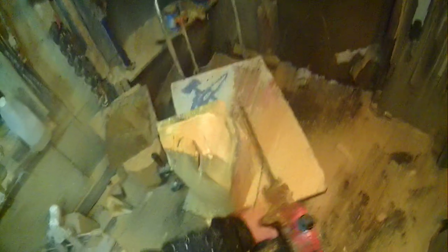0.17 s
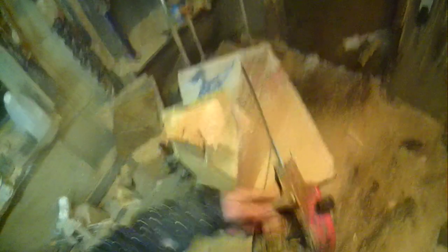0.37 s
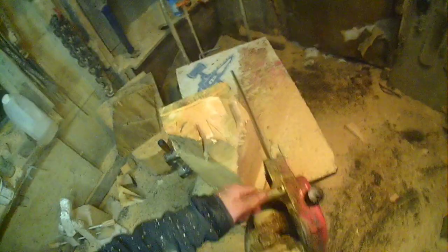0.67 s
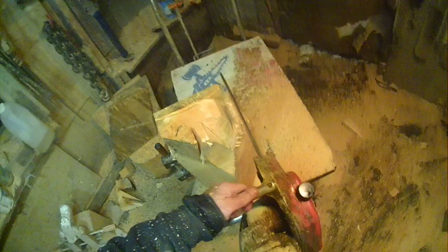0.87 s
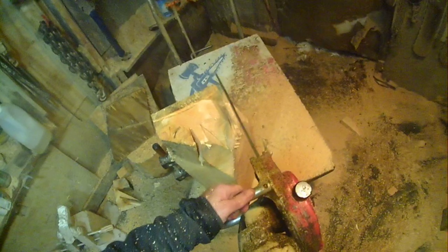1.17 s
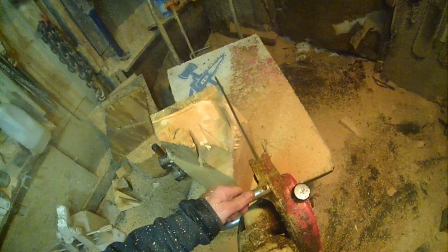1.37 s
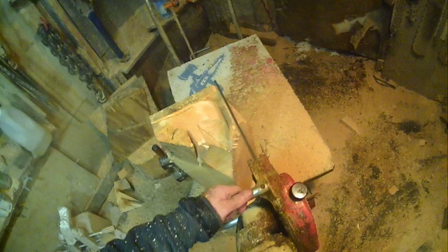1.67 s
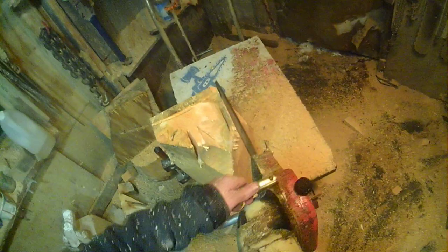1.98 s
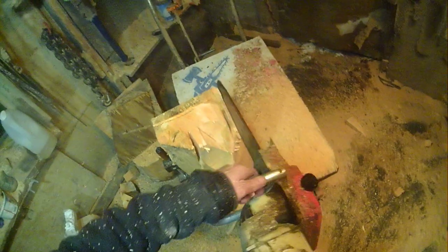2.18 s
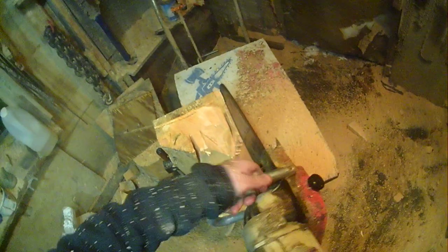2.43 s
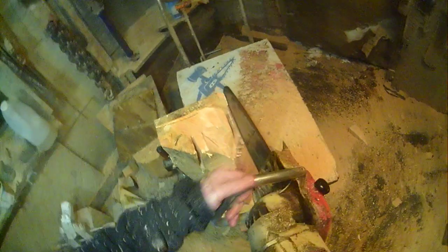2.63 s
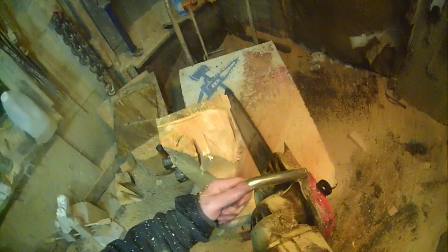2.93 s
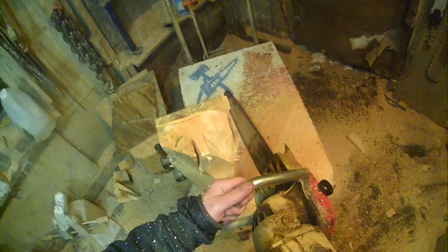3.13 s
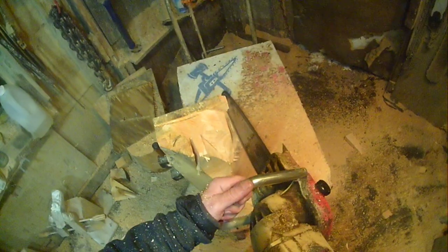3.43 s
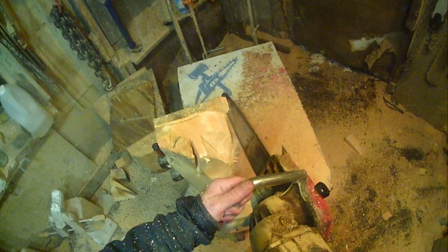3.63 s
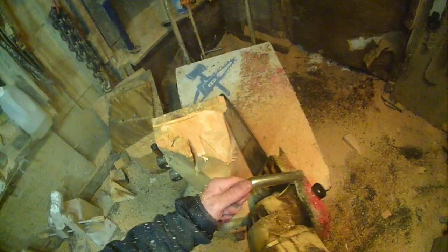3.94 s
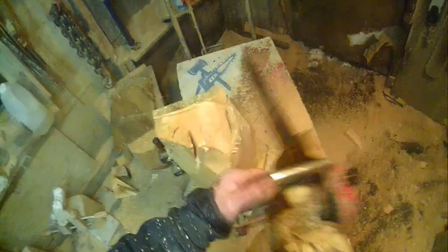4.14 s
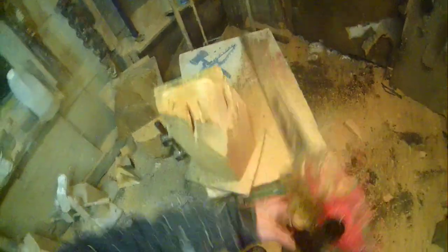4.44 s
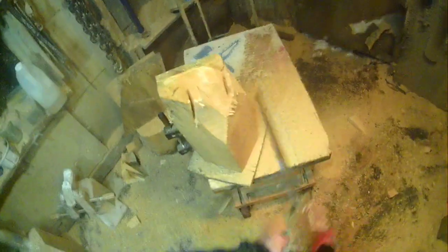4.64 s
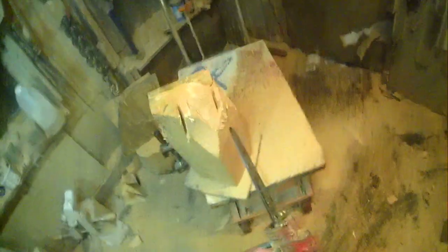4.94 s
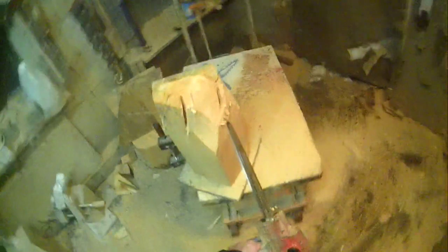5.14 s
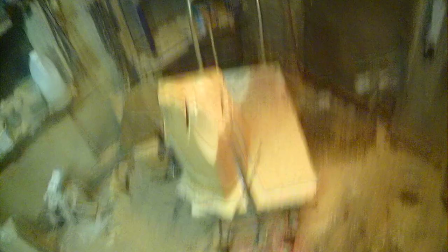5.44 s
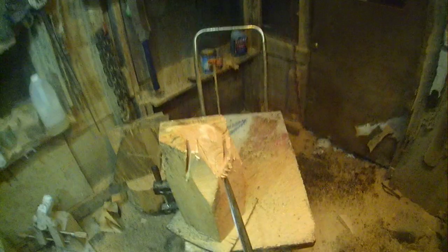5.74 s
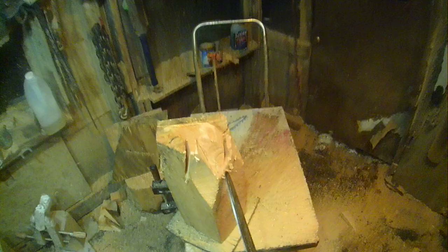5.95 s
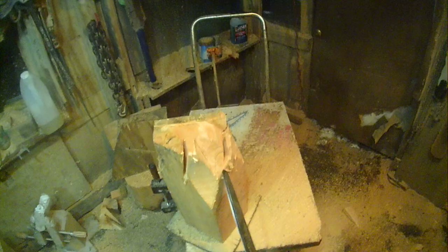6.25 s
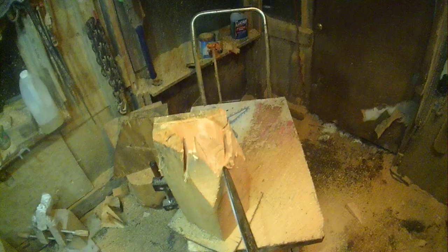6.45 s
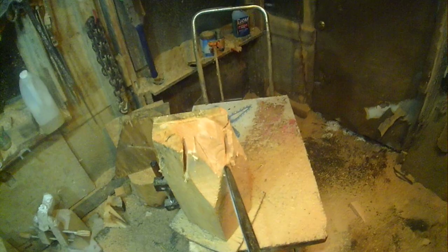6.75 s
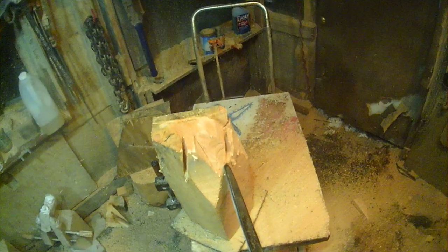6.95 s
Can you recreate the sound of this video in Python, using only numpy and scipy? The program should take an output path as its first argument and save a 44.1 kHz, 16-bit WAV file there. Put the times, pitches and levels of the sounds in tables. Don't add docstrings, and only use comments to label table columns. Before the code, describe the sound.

A motor saw is already at full speed, close up in a small, dry shed: clean hum around 380 Hz, a wavering whine twelve times higher, a buzzing drive-link note, and dense gritty chain rattle over a drumming wood block. A short opening buzz fades by 0.2 s. From 0.4 to 0.75 s the trigger is released and pitch dips, then recovers. Between 1.3 and 4.1 s the cut loads the motor, pitch sagging unevenly while wood drumming and chip spray thicken; a short scrape comes at 3.8 s. At 4.13 s the motor is let go and glides down steadily, with bright scrapes and a sharp tick around 4.4-4.5 s, the rattle thinning. At 5.8 s power returns and pitch climbs quickly, continuing to 7.1 s with a gear note and low scrape near 6.9 s. Thin, treble-poor microphone; tiny clicks every 0.2 s.

```python
import sys
import numpy as np
from scipy import signal
from scipy.fft import rfft, irfft, next_fast_len
from scipy.io import wavfile

SR = 44100
rng = np.random.default_rng(int(sys.argv[2]) if len(sys.argv) > 2 else 0)


def gain_from_db(level_db):
    decades = np.asarray(level_db, float) / 20
    return 10 ** decades


def file_out(sig):
    cols = np.atleast_2d(sig).T
    lim = np.clip(cols, -1, 1)
    pcm = np.round(lim * 32767).astype(np.int16)
    wavfile.write(sys.argv[1], SR, pcm)


N = 313551
LINKS_PER_TURN = 25 / 12
USUAL_TURNS_PER_S = 370


def rms_one(x):
    return x / np.sqrt(np.mean(x ** 2) + 1e-20)


def in_time(rows):
    s, *columns = np.transpose(rows)
    return [np.interp(np.arange(N) / SR, s, column) for column in columns]


def bump(at_s, half_width_s):
    return np.exp(-((np.arange(N) / SR - at_s) / half_width_s) ** 2)


def drift(rate_hz):
    r = np.exp(-80 * np.pi * rate_hz / SR)
    noise = rng.standard_normal(N // 40 + 2002)
    slow = signal.lfilter([1], [1, -2 * r, r * r], noise)[2000:]
    return np.interp(np.arange(N) / 40, np.arange(len(slow)), rms_one(slow))


# off_s, on_again_s
COASTS = [
    (.391, .742),
    (4.13, 5.796),
]
# time_s, speed_turns_per_s
ALLOWED = [(0, 386), (.2, 393), (.4, 388), (.8, 387), (1.25, 388.7), (1.45, 375.2), (1.75, 378),
           (2.0, 382.6), (2.6, 377.9), (2.9, 364.3), (3.2, 371.5), (3.6, 355), (4.0, 356.4), (4.1, 384.5),
           (5.8, 384.5), (6.2, 376.9), (6.7, 384.8), (7.1, 371.7)]


def rotor():
    step_s, spin_up_s = .001, .5
    drag_turns_per_s2, drag_power = 98.2, 1.53
    t = np.arange(0, N / SR + step_s, step_s)
    allowed = np.interp(t, *np.transpose(ALLOWED))
    coasting = sum((t >= off) & (t < on) for off, on in COASTS)
    speed = [376]
    for goal, free in zip(allowed, coasting):
        now = speed[-1]
        drag = drag_turns_per_s2 * (now / USUAL_TURNS_PER_S) ** drag_power
        change = -drag if free else (goal - now) / spin_up_s
        speed.append(now + step_s * change)
    return np.interp(np.arange(N) / SR, t, speed[:-1])


# speed_turns_per_s, level_db
HUM = [(245, -74), (258, -53), (270, -42.5), (295, -40), (312, -35), (335, -29), (360, -26.5), (380, -26.5)]
# speed_turns_per_s, level_db
WHINE = [(245, -34), (263, -37), (278, -44), (292, -44), (312, -41), (340, -32.5), (366, -33.5), (381, -38)]
# time_s, gain_db
AWAY = [(0, -1.5), (2.6, -2), (3.5, -4), (4.0, -4), (4.35, -2), (4.55, -3.5), (5.0, -3.5), (6.1, -7.5),
        (6.4, -5), (6.75, -8.5), (7.11, -5.5)]
# time_s, whine_gain_db
VENTS = [(0, 0), (.36, 4.5), (.75, -3.5), (1.2, 4), (1.9, 1), (2.15, 5), (2.45, -9.5), (2.7, 1), (2.95, 0),
         (3.35, 10), (3.7, 1), (3.9, 5.5), (4.27, 4.5), (4.47, -6), (4.9, -1), (5.17, -9), (5.4, 0),
         (7.11, -1.5)]
# time_s, level_db
TENSION = [(0, -41), (.27, -35.5), (.4, -43), (.5, -33.5), (.76, -45), (1.25, -35), (1.9, -35), (2.0, -42),
           (2.12, -37), (2.55, -36.5), (3.15, -30), (3.52, -31.5), (3.95, -39), (4.86, -45), (5.0, -61),
           (6.0, -52), (6.4, -38.5), (7.11, -35)]


def motor_levels(speed):
    away_db, = in_time(AWAY)
    vents_db, = in_time(VENTS)
    link_db, = in_time(TENSION)
    hum_db = np.interp(speed, *np.transpose(HUM)) + away_db
    slot_db = np.interp(speed, *np.transpose(WHINE)) + away_db + vents_db
    return hum_db, slot_db, link_db


def tone(turns, multiple, db, waver_db):
    wave = np.sin(2 * np.pi * (multiple * turns + rng.random()))
    return np.sqrt(2) * gain_from_db(db + waver_db * drift(11)) * wave


# multiple_of_rotor, level_under_bar_rattle_db
GEARS = [(25 / 4, -22), (25 / 3, -24)]
# start_s, end_s, multiple_of_rotor, level_db
SPELLS = [
    (1.36, 1.86, 25 / 48, -57),
    (0, .2, 4 / 3, -42),
    (0, .17, 2, -38),
    (2.4, 2.8, 25 / 8, -43),
    (4.33, 4.5, 25 / 8, -40),
    (6.25, 6.7, 25 / 8, -52),
    (6.68, 7.2, 25 / 8, -37),
    (5.4, 5.7, 25 / 12, -55),
    (5.74, 5.92, 25 / 12, -47),
]
# time_s, change_db
FADES = [(.22, -10), (.26, -8), (.305, -17), (.36, 4), (.62, -7), (.78, -7), (.84, 3), (1.3, -5),
         (1.35, -6), (2.43, -12), (3.73, -7), (4.42, -10), (4.52, -14), (4.6, 5), (4.655, -20), (4.75, -8),
         (4.88, -8), (5.07, -10), (5.56, -10), (5.64, -7), (5.72, -9), (5.83, -3), (5.96, -8), (6.04, -8),
         (6.16, -22), (6.275, -16), (6.39, -16), (6.55, -14), (6.87, -12), (7.03, -6)]


def motor(turns, hum_db, slot_db, link_db, bar_db):
    t = np.arange(N) / SR
    slot_db = slot_db + sum(db * bump(s, .022) for s, db in FADES)
    out = tone(turns, 1, hum_db, waver_db=0.2)
    out += tone(turns, 12, slot_db, waver_db=2.0)
    out += tone(turns, LINKS_PER_TURN, link_db, waver_db=0.44)
    for multiple, db in GEARS:
        out += tone(turns, multiple, bar_db + db, waver_db=4.5)
    for on, off, multiple, db in SPELLS:
        gate = np.clip(np.minimum(t - on + .03, off - t) / .04, 0, 1)
        out += gate * tone(turns, multiple, db, waver_db=.8)
    return out


# time_s, chain_rattle_at_usual_speed_db, bite_into_block_db
CUT = [(0, -28.5, 0.5), (.15, -30.5, -0.5), (.45, -27.5, 0.5), (.72, -27.5, 0), (1.2, -28, 0.5),
       (1.68, -26, 0.5), (2.0, -27, 1), (2.5, -26.5, 2), (2.9, -25.5, 1.5), (3.3, -25.5, 1), (3.75, -25, 3),
       (3.98, -25.5, 2.5), (4.2, -27.5, 2), (4.45, -25.5, -1.5), (4.7, -29.5, 0.7), (5.1, -31, 1),
       (6.3, -31.5, -0.6), (7.11, -28.5, 0)]
# time_s, half_width_s, extra_ring_db, extra_chip_spray_db
DIGS = [(.15, 0.28, 3, 1.5), (.75, 0.3, -0.5, -1.5), (1.5, .1, -1, 1.5), (1.75, 0.17, 0.5, 0.5),
        (2.35, 0.2, -2.5, -1.5), (2.9, .15, 0.5, 0.5), (3.4, 0.066, 3, -0.5), (3.65, .17, 3, 1),
        (4.17, 0.08, -1, -5), (4.4, 0.11, 3, 1), (5.4, 0.17, 2.5, -1.5), (6.5, .15, 1.5, -2)]


def chain_levels(speed):
    rattle_db, bite_db = in_time(CUT)
    bar_db = rattle_db + 30.5 * np.log10(speed / USUAL_TURNS_PER_S)
    dig_db, spray_db = sum(np.outer(db, bump(s, half)) for s, half, *db in DIGS)
    block_db = bar_db - 13 + 1.12 * bite_db
    nose_db = bar_db - 3.5 + 0.22 * bite_db + dig_db
    chips_db = bar_db - 15.5 + 0.87 * bite_db + spray_db
    return block_db, bar_db, nose_db, chips_db


def contacts(turns, grit_db, beat):
    grit = np.minimum(rng.exponential(1, N), 5)
    sizes = gain_from_db(grit_db * grit) * rng.standard_normal(N)
    return sizes * (1 + beat * np.cos(2 * np.pi * LINKS_PER_TURN * turns))


def body(force, modes, patchy_db, rate_hz):
    out = 0
    for k, (hz, width_hz, db) in enumerate(modes):
        r = np.exp(-np.pi * width_hz / SR)
        feedback = [1, -2 * r * np.cos(2 * np.pi * hz / SR), r * r]
        push = force * gain_from_db(db + patchy_db * drift(rate_hz))
        ring = signal.lfilter([(1 - r * r) / 2, 0, (r * r - 1) / 2], feedback, push)
        out = out + (-1) ** k * ring
    return out


def microphone(x):
    low = signal.butter(3, 284, "high", fs=SR, output="sos")
    high = signal.butter(4, 5300, fs=SR, output="sos")
    return signal.sosfilt(np.vstack([low, high]), x)


# pitch_hz, width_hz, level_db
BLOCK = [(315, 170, -11), (516.5, 80, 1), (624, 88, 1.5), (728, 100, -2)]
BAR = [(880, 300, -15), (1139, 82, -5), (1317, 120, -2.5), (1586, 135, -0.5), (1737, 59, 2),
       (1872, 143, -2), (2200, 430, -6.5)]
NOSE = [(2379, 80, -3.5), (2612, 102, 1), (2820, 76, 2), (2996, 255, -3.5), (3200, 480, -9.5)]
CHIPS = [(3430, 1100, -11.5), (4066, 190, -0.5), (4566, 490, -2), (5075, 830, -5)]
FAN = [(3600, 580, -5.5), (4300, 420, -1.5), (5090, 530, -1.5), (5207, 130, -4), (5970, 570, -15.5)]
CASE = [(131, 110, -8), (210, 70, -7.5), (354, 70, -6), (468, 67, -6), (721, 130, -1.5), (817, 210, 0.5),
        (1063, 88, 0.5)]


def chain(turns, speed, block_db, bar_db, nose_db, chips_db):
    speed_decades = np.log10(speed / USUAL_TURNS_PER_S)
    parts = [(BLOCK, block_db + 0.89), (BAR, bar_db + 0.13), (NOSE, nose_db + 0.065), (CHIPS, chips_db + 4.5),
             (FAN, -43 + 45 * speed_decades), (CASE, -41.5 + 25 * speed_decades)]
    out = 0
    for modes, db in parts:
        force = contacts(turns, grit_db=3.5, beat=.25)
        ring = body(force, modes, patchy_db=.9, rate_hz=40)
        out = out + gain_from_db(db) * rms_one(microphone(ring))
    return out


# pitch_hz, level_db
RUMBLE = [(25, -24), (60, -21.5), (100, -16.5), (160, -7.5), (235, -8), (300, 5), (400, -10.5),
          (600, -34.5)]


def rumble(block_db):
    hz = np.maximum(np.arange(N // 2 + 1) * SR / N, 1)
    known_hz, known_db = np.transpose(RUMBLE)
    colour_db = np.interp(np.log(hz), np.log(known_hz), known_db) - 60 * (hz > 1500)
    noise = irfft(rfft(rng.standard_normal(N)) * gain_from_db(colour_db), N)
    return gain_from_db(-17 + block_db + 0.71 * drift(2.8)) * rms_one(noise)


def hiss():
    return gain_from_db(-76) * rms_one(signal.lfilter([1], [1, -.99], rng.standard_normal(N)))


def rasp(hz, width_hz):
    mode = [(hz, width_hz, 0)]
    once = body(rng.standard_normal(N), mode, patchy_db=1.2, rate_hz=30)
    return rms_one(body(once, mode, patchy_db=0, rate_hz=30))


# time_s, half_width_s, pitch_hz, width_hz, level_db
SCRAPES = [
    (4.41, .04, 4550, 500, -38),
    (4.465, .011, 4500, 600, -32),
    (4.63, .008, 3350, 400, -42),
    (3.83, .02, 2950, 400, -33),
    (6.93, .12, 1600, 450, -36),
]


def scrapes():
    return sum(gain_from_db(db) * bump(s, half) * rasp(hz, width) for s, half, hz, width, db in SCRAPES)


def shed(x):
    t60_s, echo_db = .18, -15
    size = next_fast_len(N + SR)
    w = 2 * np.pi * np.arange(size // 2 + 1) / size
    echo = 0
    for lag in rng.uniform(.012, .04, 8) * SR:
        loss = gain_from_db(-60 * lag / SR / t60_s)
        echo = echo + 1 / (1 - loss * np.exp(-1j * w * lag)) - 1
    return irfft(rfft(x, size) * (1 + gain_from_db(echo_db) * echo / np.sqrt(8)), size)[:N]


def scene():
    speed = rotor()
    turns = np.cumsum(speed) / SR
    levels = chain_levels(speed)
    block_db, bar_db = levels[:2]
    noise = shed(chain(turns, speed, *levels) + scrapes())
    notes = motor(turns, *motor_levels(speed), bar_db)
    return (notes + noise + rumble(block_db) + hiss())[None]


def converter(x):
    half_rate_hz = 11025 / 2
    hz = np.arange(N // 2 + 1) * SR / N
    fold = round(half_rate_hz * N / SR)
    spectrum = rfft(x) / (1 + np.exp(np.clip((hz - half_rate_hz + 30) / 25, -50, 50)))
    above_hz = hz[fold:2 * fold] - half_rate_hz
    image_db = 2 - 31.5 * (above_hz / 700) ** 0.76
    end_db = -20 * np.minimum(above_hz / 765, 2) ** 10
    image = np.conj(spectrum[:, fold:0:-1]) * gain_from_db(image_db)
    spectrum[:, fold:2 * fold] += image * gain_from_db(end_db)
    return irfft(spectrum, N)


LOUD_DROPS = {0: -32, 1: -30, 3: -26, 2: -45, 4: -36, 5: -46, 6: -47, 7: -38, 8: -27, 9: -31, 10: -39, 11:
              -34, 12: -38, 14: -29, 15: -30, 16: -30, 17: -37, 19: -39, 20: -35, 21: -35, 22: -44, 26: -44,
              24: -40, 28: -38, 30: -41, 33: -39, 34: -36}


def drops():
    k = np.arange(35)
    s = .1926 + .201 * (k - (k + 10) // 17 / 4)
    faint_db = -52 + 3 * rng.standard_normal(len(k))
    return [(s[i], LOUD_DROPS.get(i, faint_db[i])) for i in k]


def roll_off(x):
    return signal.sosfilt(signal.butter(12, 15900, fs=SR, output="sos"), x)


def record(dry):
    x = converter(dry) + .0022
    near = np.arange(-40, 41)
    tick = np.sinc(near * 32000 / SR) * np.hanning(len(near))
    tick = np.convolve(tick, [.07, 1, .07], "same")
    for s, db in drops():
        i = round(s * SR)
        x[0, i + near] -= np.sign(x[0, i]) * gain_from_db(db + 6) * tick
    return roll_off(x)


dry = scene()
out = record(dry)
file_out(out)
```